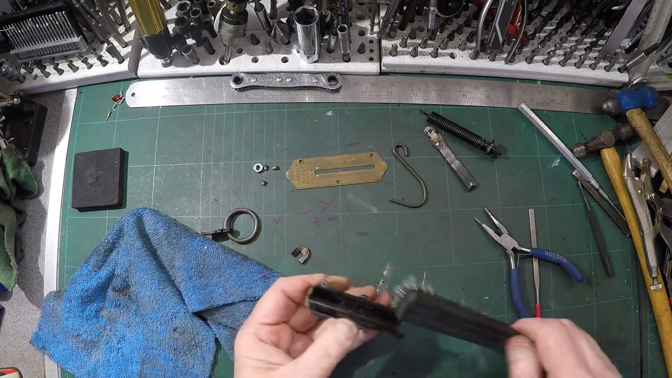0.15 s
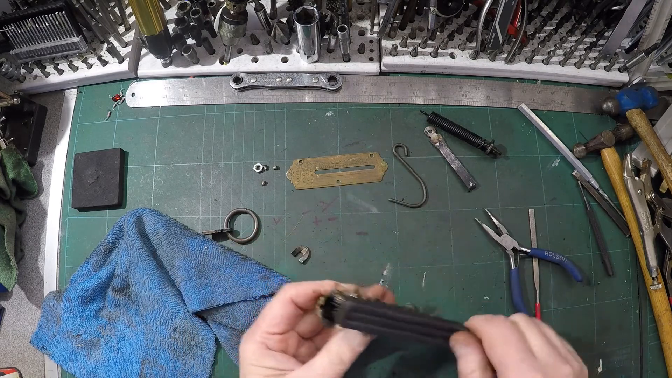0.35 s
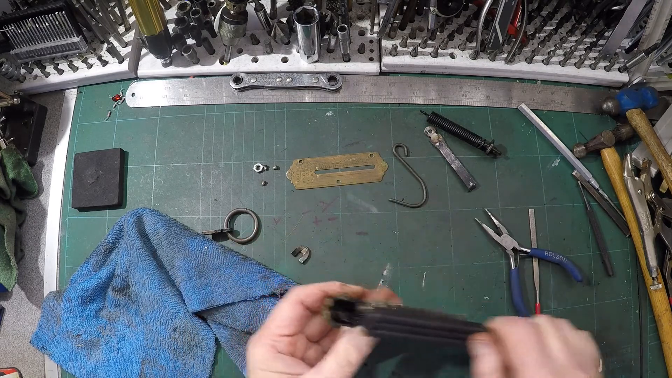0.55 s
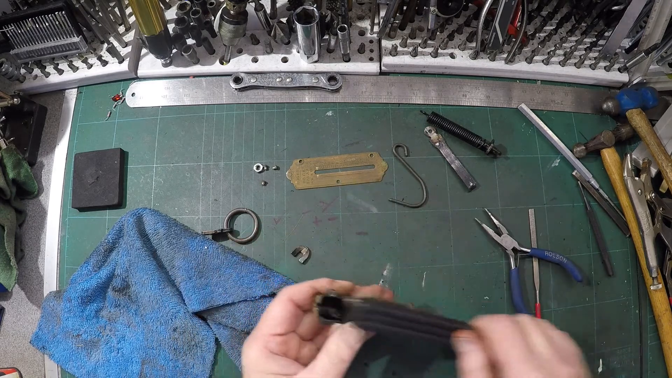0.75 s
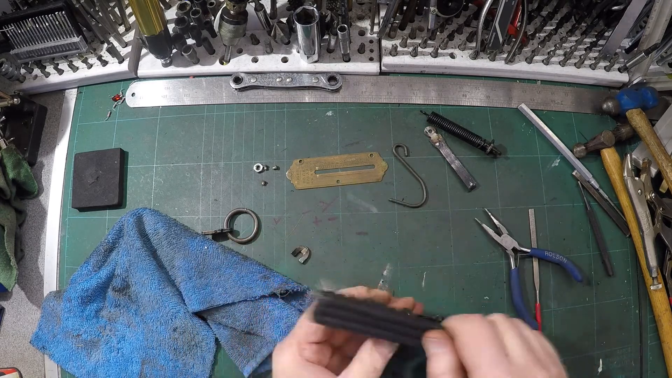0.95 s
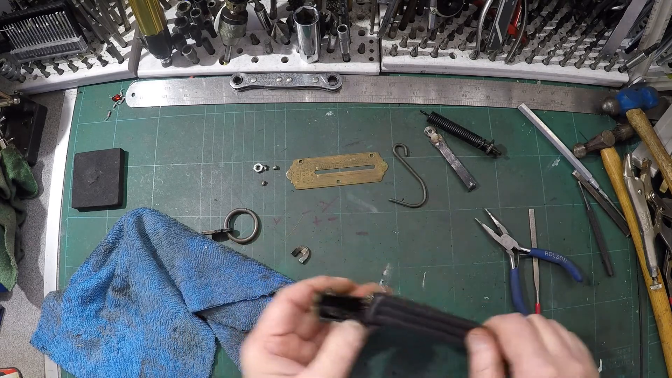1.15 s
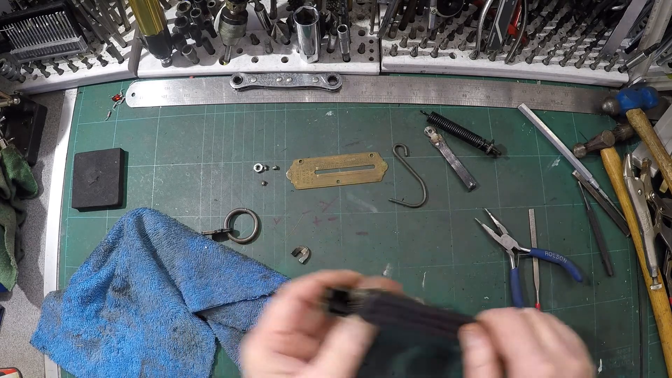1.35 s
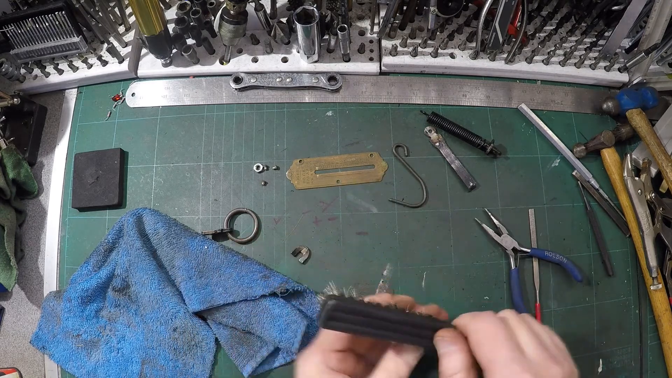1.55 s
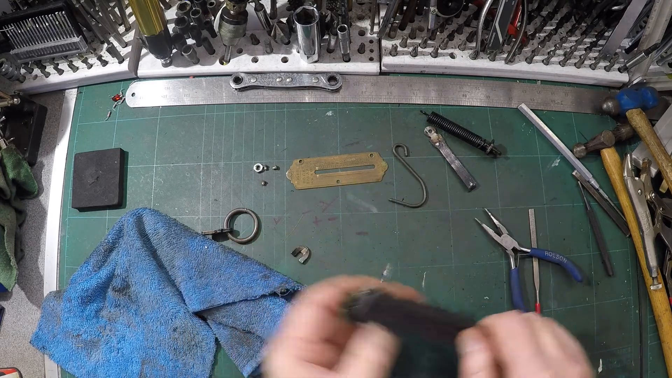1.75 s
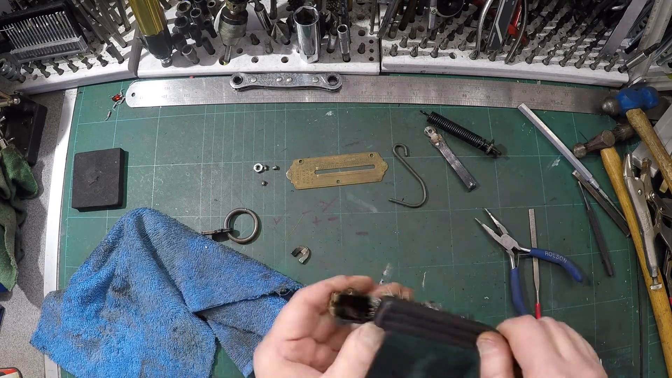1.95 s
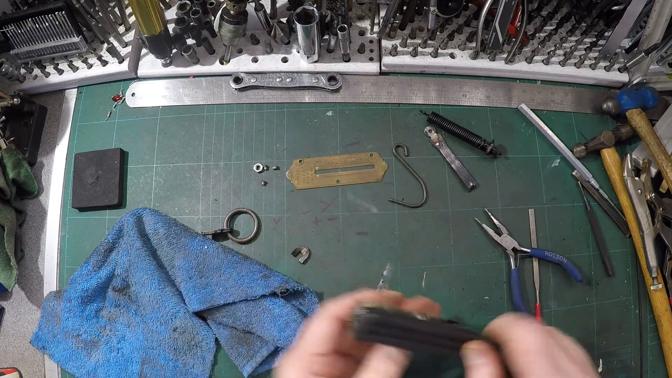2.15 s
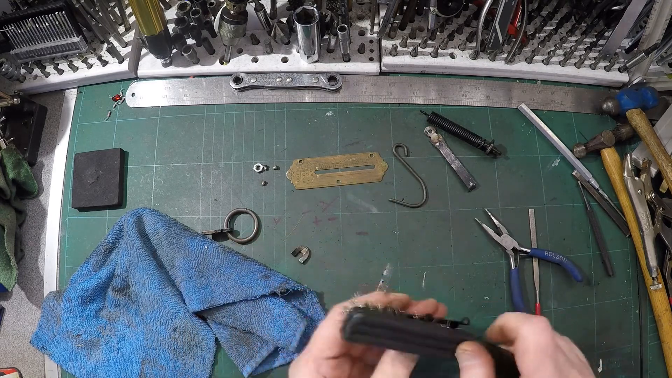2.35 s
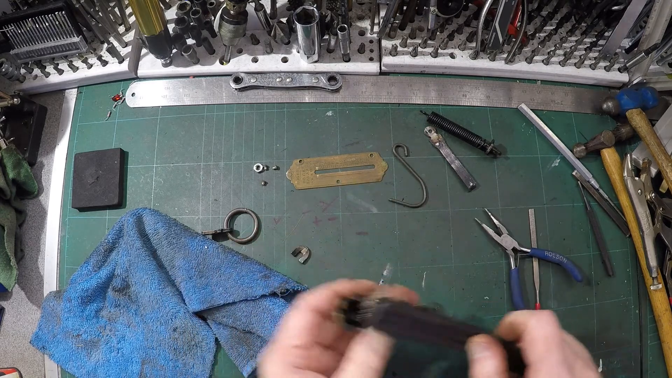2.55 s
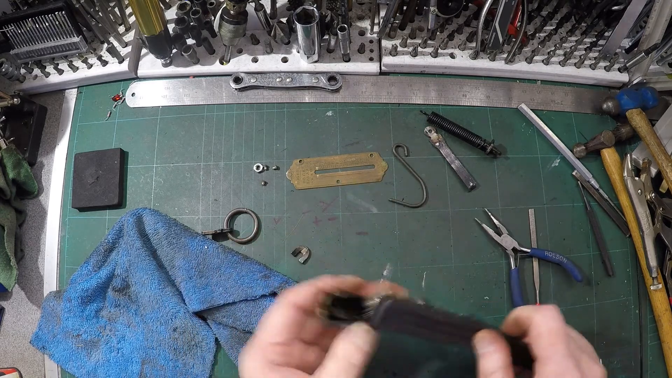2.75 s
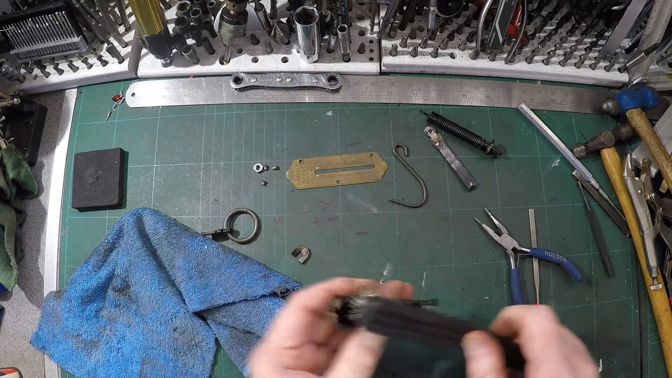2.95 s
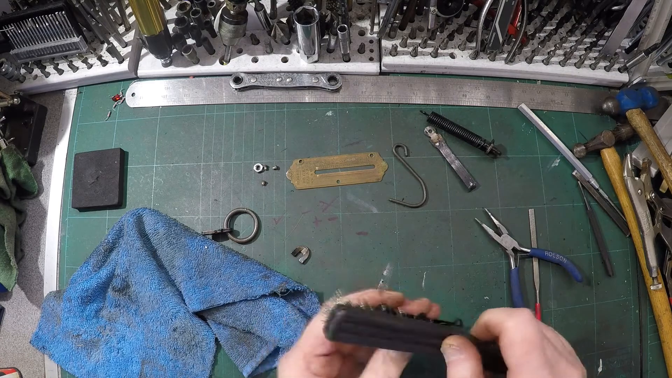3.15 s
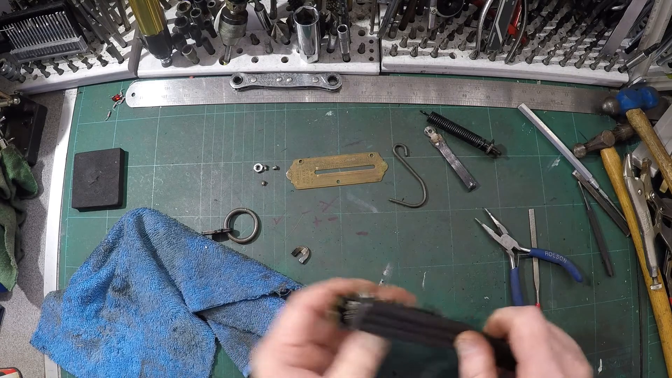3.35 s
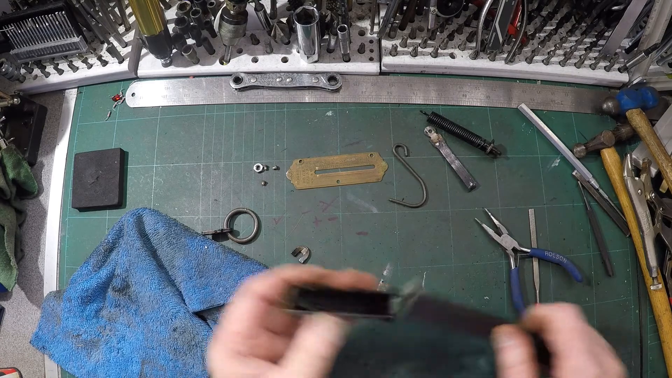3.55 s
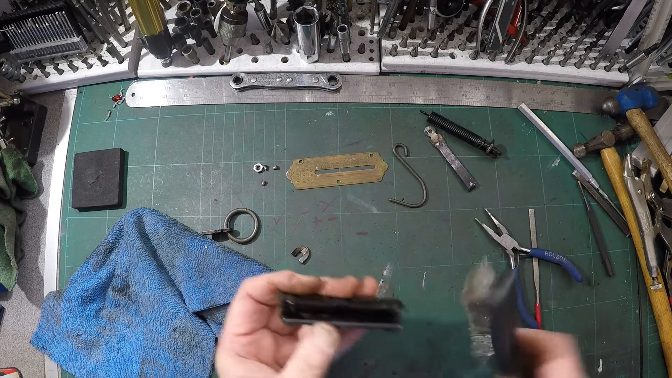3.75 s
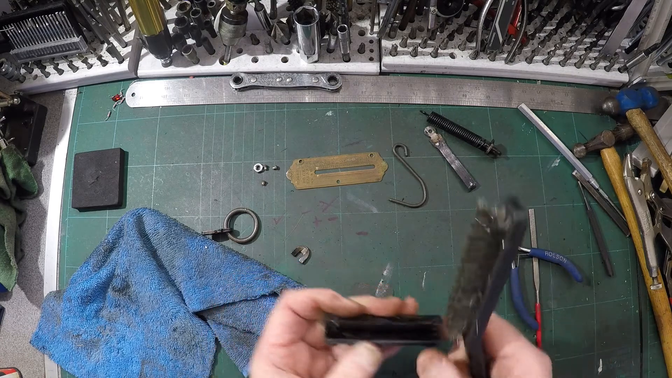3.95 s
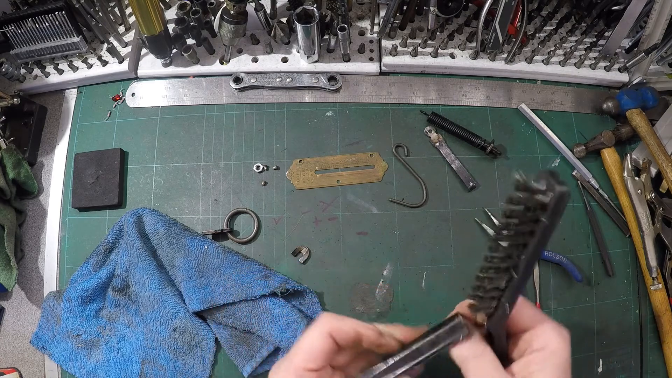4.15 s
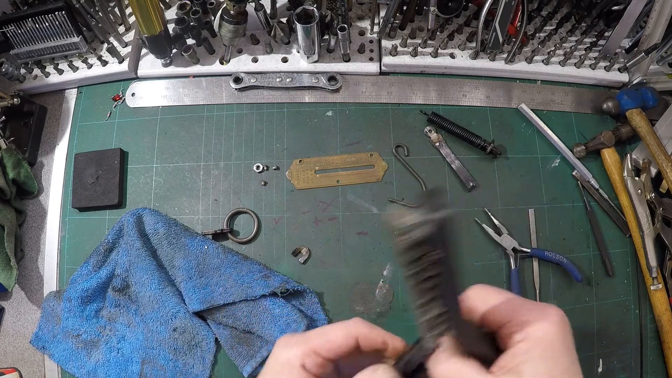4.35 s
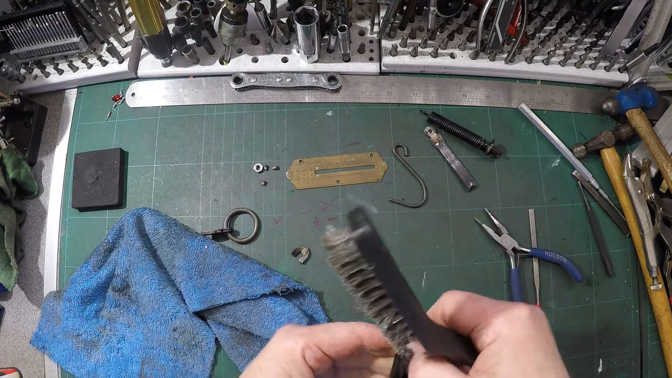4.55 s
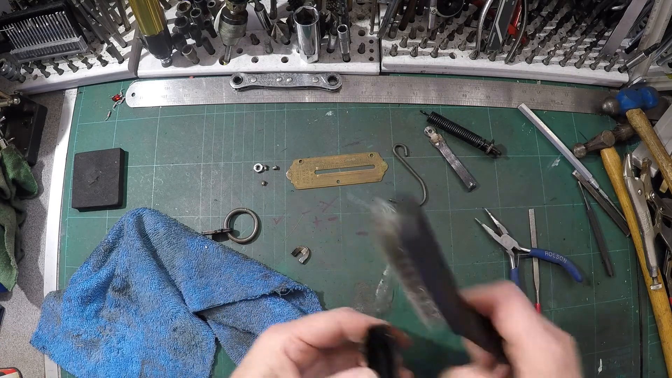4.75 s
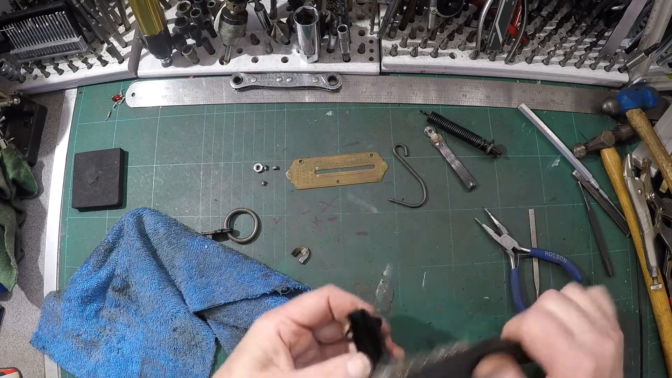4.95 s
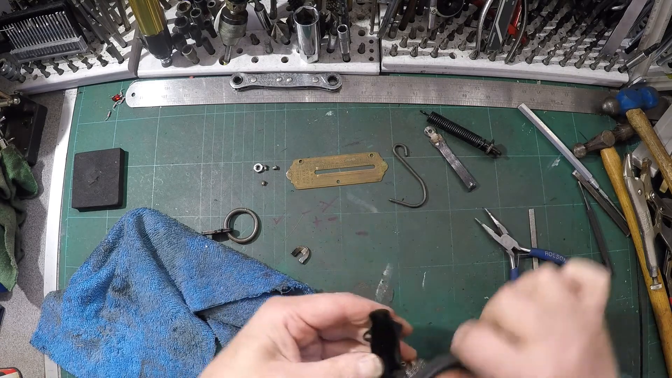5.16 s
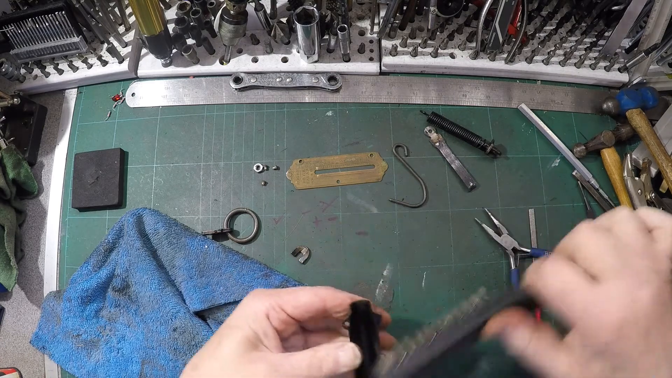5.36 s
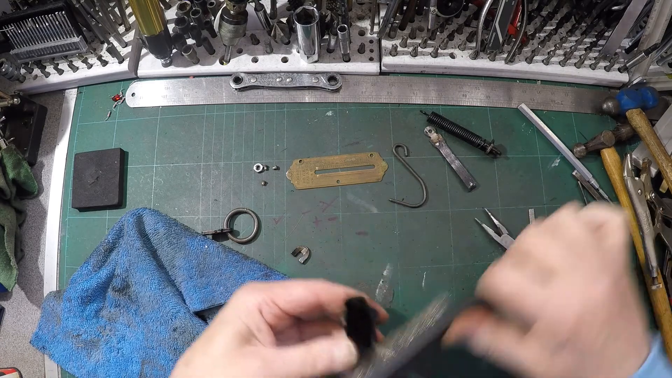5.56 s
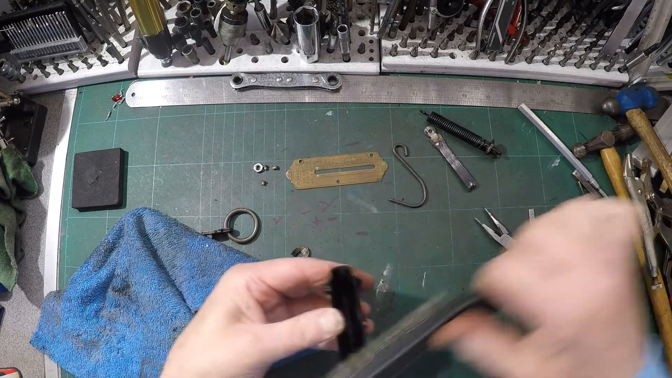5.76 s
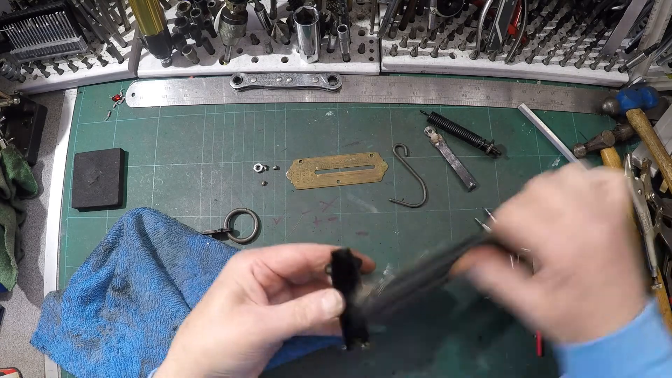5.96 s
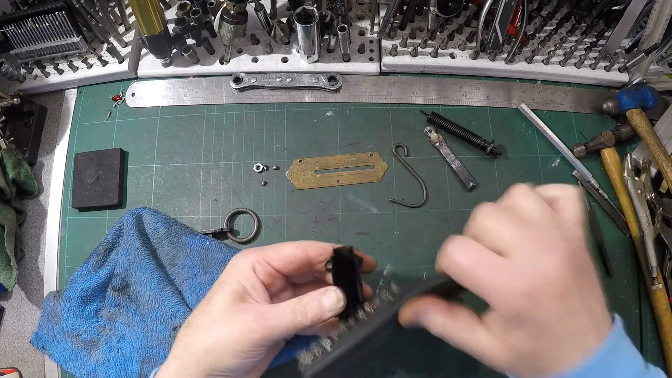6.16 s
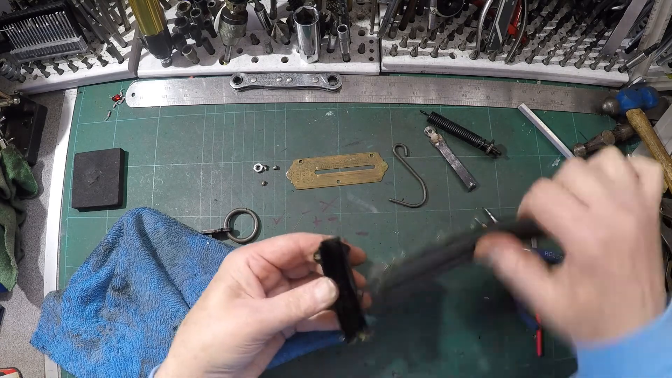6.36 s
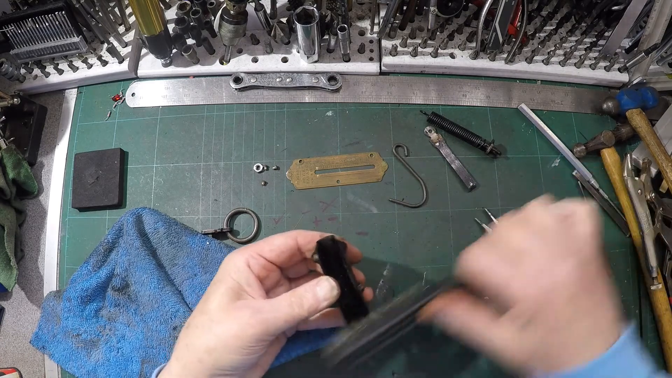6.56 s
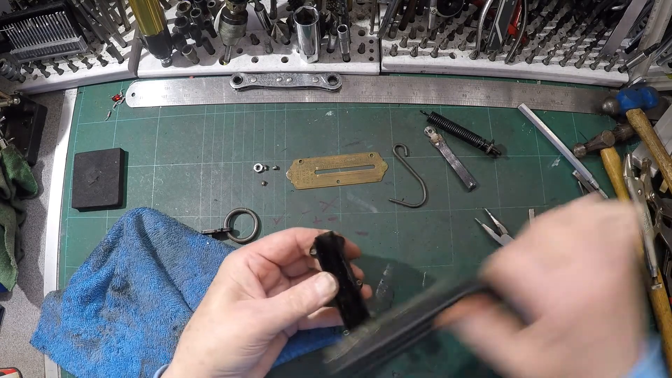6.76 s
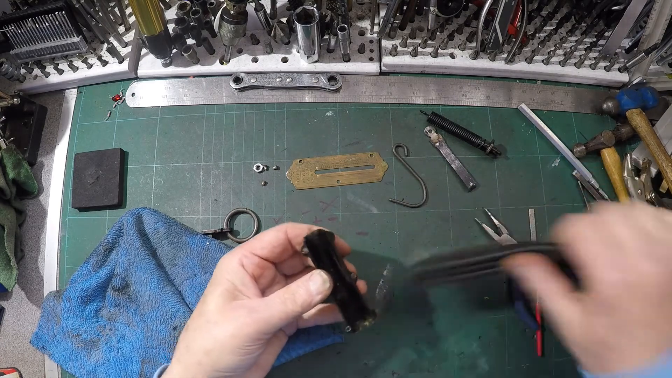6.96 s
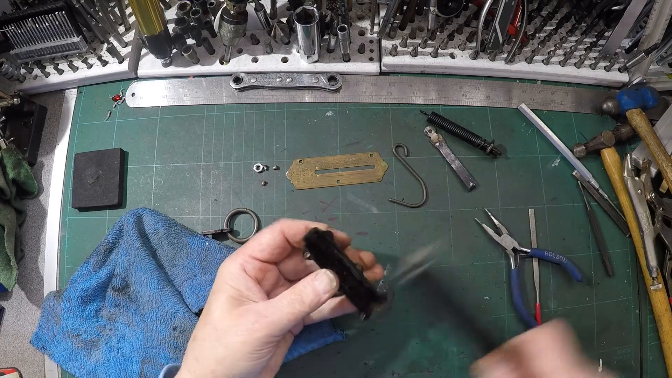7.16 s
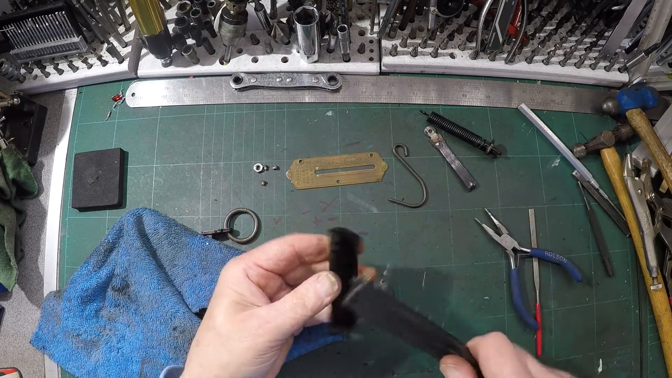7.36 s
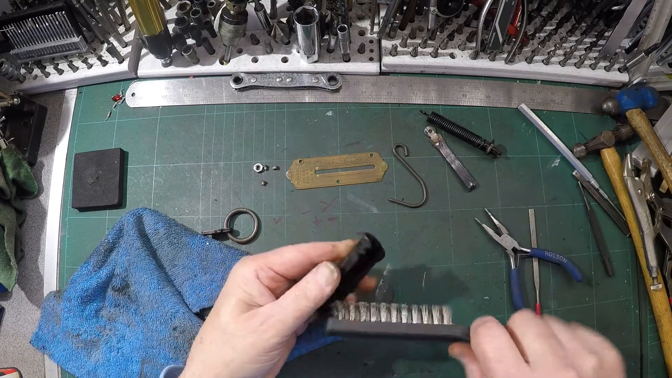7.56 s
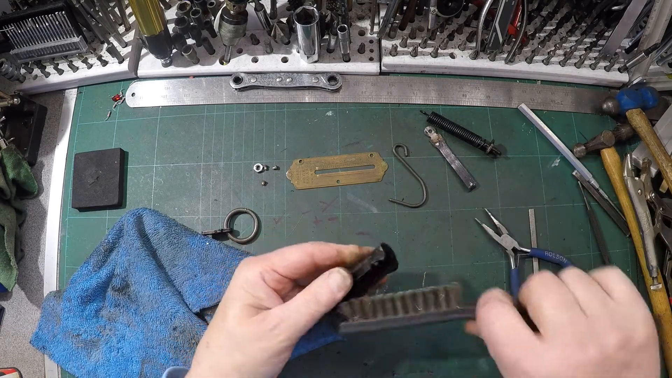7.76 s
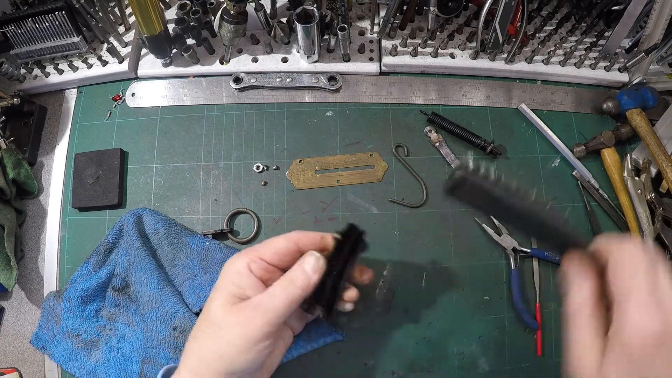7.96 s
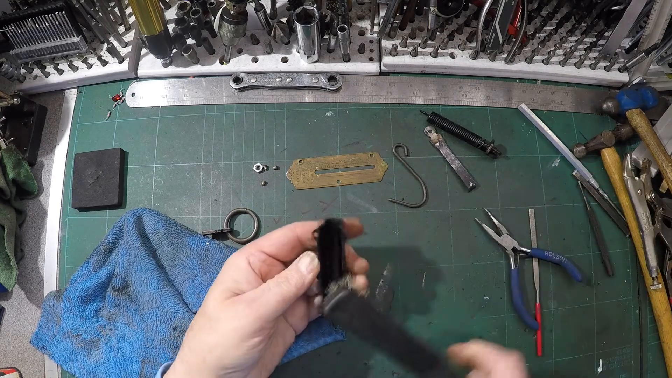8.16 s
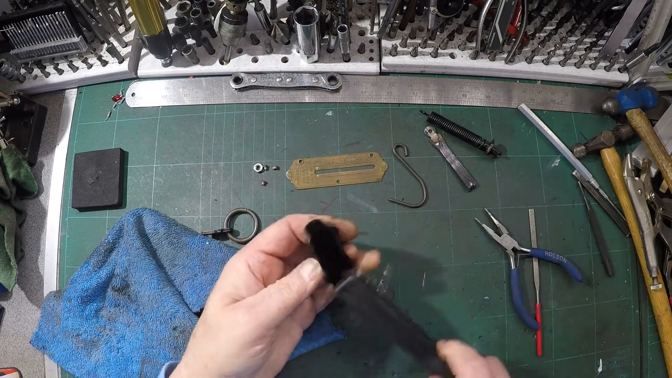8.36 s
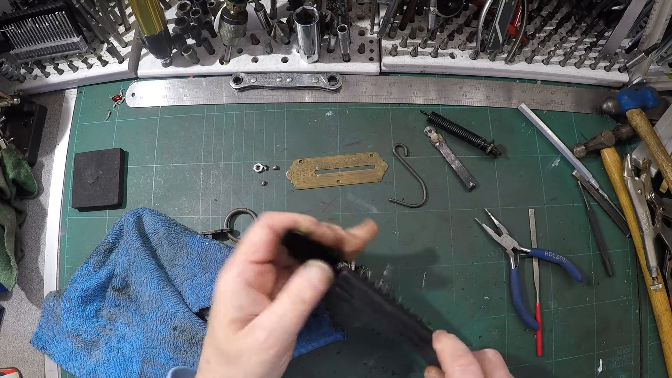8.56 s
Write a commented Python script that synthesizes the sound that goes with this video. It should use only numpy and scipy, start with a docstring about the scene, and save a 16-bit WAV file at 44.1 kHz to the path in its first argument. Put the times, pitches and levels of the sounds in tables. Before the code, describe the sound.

Close stereo sound of wire bristles rasping over a small steel piece: about seven gritty back-and-forth strokes a second, hissy and faintly ringing, for over three seconds. After a thin metallic ping the brushing almost stops, resumes as six slower spaced scratches, then softens to touches, small knocks and faint tings. A sharp ringing click comes near the end. Short workshop reflections and soft steady background noise.

```python
"""Wire brush on a small steel part

A steel wire hand brush scrubs a small hand-held steel part at a workbench, below a two-port camera microphone.
Hundreds of wires snap off the edges in each stroke: random pulses crackle, hiss and ring the modes of the part.
Quick strokes along it, a pause with light brushes, slower strokes across it, a few touches and knocks, one tap.
Coloured noise makes the steady hush of the shop; random decaying tails follow the brush and the part."""
import sys
import numpy as np
from scipy import signal
from scipy.fft import rfft, irfft, next_fast_len
from scipy.io import wavfile
from scipy.ndimage import uniform_filter1d

SR = 44100
rng = np.random.default_rng(int(sys.argv[2]) if len(sys.argv) > 2 else 0)


def persist_wave(psi):
    """Save psi, clipped to +-1, as 16-bit WAV."""
    counts = np.round(np.clip(psi, -1, 1) * 32767).astype(np.int16)
    wavfile.write(sys.argv[1], SR, np.atleast_2d(counts).T)


N = 379701
FFT = next_fast_len(N)

# Modes of the steel part. Each row: pitch in Hz, time to fall 60 dB in seconds, then its relative level in dB
# when brushed along, brushed across and tapped.
MODES = [(1450, .04, -20, -14, -23), (1600, .035, -15, -13, -19), (1800, .03, -13, -17, -20),
         (1965, .045, -16, -2, -22), (2720, .035, -14, -22, -14), (3020, .022, -11, -12, 4),
         (3220, .08, -14, -5, -14), (3440, .025, -8, -13, -13), (3700, .045, -11, -8, -11),
         (4120, .045, -9, -6, -14), (4520, .05, -13, -2, -16), (5400, .028, -15, -3, -18),
         (5960, .028, 1, -5, -20), (6090, .04, -5, -7, -20), (6200, .028, -3, -3, -20),
         (6530, .025, -8, -2, -16)]
HIGH_RING_HZ = 5000  # modes above it follow the ring effort, those below the crackle effort


def undb(db):
    """Gain of a level in dB."""
    return 10 ** (np.asarray(db) / 20)


def level(x, db):
    """Scaled to an rms level in dB."""
    return x * undb(db) / np.sqrt(np.mean(x ** 2))


def read_table(table, hz):
    """Second column of a table with Hz in the first, read on a log-frequency axis."""
    points = np.array(table)
    return np.interp(np.log(hz + 1), np.log(points[:, 0]), points[:, 1])


def coloured(x, table):
    """Gain of a (Hz, dB) table laid on the spectrum."""
    gain = undb(read_table(table, np.fft.rfftfreq(FFT, 1 / SR)))
    return irfft(rfft(x, FFT) * gain, FFT)[:N]


def response(table, size=1024):
    """Short causal response with the colour of a (Hz, dB) table, from the folded cepstrum; energy 1."""
    gain = undb(read_table(table, np.fft.rfftfreq(size, 1 / SR)))
    cepstrum = irfft(np.log(gain))
    cepstrum[1:size // 2] *= 2
    cepstrum[size // 2 + 1:] = 0
    h = irfft(np.exp(rfft(cepstrum)))
    return h / np.sqrt(np.sum(h ** 2))


def through(x, h):
    """Convolution cut to the length of the scene."""
    return signal.oaconvolve(x, h)[:N]


def fade(t60, size):
    """Decay of 60 dB in t60 seconds."""
    return np.exp(-np.log(1000) * np.arange(size) / SR / t60)


def drift(rate, spread_db):
    """Gain that wanders between random levels, rate of them a second."""
    knots = undb(spread_db * rng.standard_normal(int(N / SR * rate) + 2))
    return np.interp(np.arange(N) / SR * rate, np.arange(len(knots)), knots)


def bursts(rows, rise_s=.002):
    """Envelope of sudden contacts that die away, cut at 0.25 s: rows of start s, peak dB, t60 s."""
    out = np.zeros(N)
    for s, peak_db, t60 in rows:
        i = int(s * SR)
        out[i:i + SR // 4] += undb(peak_db) * fade(max(t60, .004), SR // 4)[:N - i]
    rise = int(rise_s * SR) + 1
    return uniform_filter1d(out, rise, origin=(rise - 1) // 2)  # looks back only


def mode(x, hz, t60):
    """One resonance, deaf far from its pitch; white noise comes out at the rms it went in with."""
    r = np.exp(-np.log(1000) / (t60 * SR))
    w = 2 * np.pi * hz / SR
    gain = np.sqrt((1 - r * r) / 2)
    return signal.lfilter(gain * np.array([1, 0, -1]), [1, -2 * r * np.cos(w), r * r], x)


def struck(s, db, hz, t60, rise_s=0.0017):
    """One mode set ringing at s seconds by a push that lasts rise_s, starting at a random phase."""
    out, t = np.zeros(N), np.arange(SR // 4) / SR
    i = int(s * SR)
    tone = np.sin(2 * np.pi * (hz * t + rng.random()))
    ring = np.minimum(t / rise_s, 1) * fade(t60, len(t)) * tone
    out[i:i + len(t)] = undb(db) * ring[:N - i]
    return out


def hush():
    """Steady hush of shop and microphone: mid and side noise; the low middle is opposite in the two channels."""
    # Colour of the mid. Each row: frequency in Hz, relative density in dB per Hz.
    mid_colour = [(20, -18), (45, -20.5), (108, -32), (135, -4), (155, 5.5), (330, -3), (520, -7.5),
                  (700, -10.5), (1040, -11.5), (1880, -16), (4220, -21), (6300, -19.5), (10200, -22.5),
                  (15300, -37.5)]
    # Colour of the side. Each row: frequency in Hz, relative density in dB per Hz.
    side_colour = [(20, -35), (108, -38), (135, -6.5), (155, 1), (300, -3.5), (840, -4.5), (1480, -12),
                   (1880, -16.5), (2670, -22), (4200, -29.5), (6300, -24), (10000, -27), (15300, -42)]
    mid_db, side_db = -54, -49.5  # rms before the top is cut
    mid = level(coloured(rng.standard_normal(N), mid_colour), mid_db)
    side = level(coloured(rng.standard_normal(N), side_colour), side_db)
    return np.array([mid + side, mid - side])


def effort():
    """How hard the wires crackle, push the part and hiss, as they load up, let go and land."""
    # Strokes and light brushes. Each row: start in seconds, length in seconds, loudest after a share of 0-1,
    # then relative levels in dB: wire crackle, hiss of the tips, ring of the part as the wires bite,
    # ring at the loudest, ring as they let go.
    strokes = [ (0.161, 0.068, .5, -55, -72, -68, -69, -72), (0.404, 0.16, .45, -43, -51.5, -40, -34, -45),
               (0.568, 0.17, .65, -41, -50, -38, -33.5, -45), (0.73, 0.16, .6, -41.5, -48, -41, -29, -38.5),
               (0.901, 0.15, .65, -36.5, -44.5, -34, -29, -27.5),
               (1.048, 0.16, .7, -40, -44.5, -32.5, -34.5, -31), (1.206, .14, .58, -37, -44, -32, -33, -38),
               (1.349, 0.14, .4, -39, -47.5, -33, -23.5, -26),
               (1.492, 0.14, .62, -33.5, -43, -26, -22, -27),
               (1.631, 0.15, .45, -37, -45.5, -25, -28, -27.5), (1.782, 0.12, .45, -34, -43, -31, -24, -21),
               (1.912, 0.14, .45, -41, -47, -26, -27, -26), (2.051, 0.13, .68, -36, -44, -26, -23.5, -26),
               (2.181, 0.15, .4, -40, -46, -28.5, -22.5, -31),
               (2.325, .131, .47, -35, -44.5, -32, -24.5, -33),
               (2.457, 0.12, .38, -36.5, -44, -32, -35, -30.5),
               (2.592, 0.13, .42, -33, -44, -25, -34, -27.5), (2.725, 0.14, .35, -38, -45, -26, -35, -28.5),
               (2.863, 0.11, .42, -35.5, -45, -29, -33, -38), (2.996, 0.12, .35, -40, -47, -37, -35, -26),
               (3.113, 0.13, .6, -35.5, -46.5, -29, -31.5, -26),
               (3.243, .13, .42, -38, -45.5, -25.5, -29, -30),
               (3.377, 0.11, .53, -35.5, -45.5, -29, -25, -40), (3.509, 0.14, .4, -37, -44, -40, -27, -30),
               (4.108, 0.076, .6, -60, -75, -54, -62, -64), (4.274, 0.077, .5, -61, -72, -55, -54, -60),
               (4.69, 0.086, .6, -66, -76, -66, -60, -64), (4.977, 0.08, .6, -62.5, -73, -66, -62, -66),
               (5.232, 0.17, .54, -42, -44.5, -36, -37, -37), (5.556, .17, .45, -40.5, -42, -41, -33, -39),
               (5.919, 0.16, .35, -38, -42.5, -40, -40, -31.5), (6.251, 0.14, .7, -35, -40, -32, -35, -30),
               (6.587, .15, .3, -40.5, -45.5, -31, -29, -33), (6.893, 0.12, .55, -40, -46, -36, -30, -28.5),
               (7.025, .17, .5, -63.5, -68, -58, -60, -56), (7.487, .08, .4, -65, -72, -58, -59, -61),
               (7.677, .11, .3, -62.5, -70, -58, -60, -59),
               (7.863, 0.093, .35, -47.5, -49.5, -42, -41, -44), ]
    # Tufts landing on the part. Each row: time in seconds, relative peak in dB, ring above the crackle
    # in dB before the mix gains.
    touches = [(0.382, -20, -11.5), (0.5876, -39, -1), (0.751, -29, -5), (1.4995, -28, 4),
               (1.7893, -23, -7), (1.915, -28, 0), (1.939, -29, -6), (1.9939, -32, -3), (2.337, -21, -5),
               (2.3736, -21, -1), (2.606, -27, -4), (2.9871, -19, -9), (3.1326, -26, 3), (3.2505, -26, -3),
               (3.478, -27, -8), (3.6104, -18, -17), (4.916, -34.5, -12), (5.1795, -24, -5),
               (5.202, -28, -5), (5.521, -23.5, -12), (5.891, -21, -11), (5.897, -22, -22),
               (5.9205, -26, -20), (6.231, -19, -10.5), (6.569, -21.5, -9), (6.8772, -18.5, -13),
               (6.896, -29, -5), (7.294, -32.5, 0.5), (7.4215, -43, -7), (7.4819, -36.5, -11),
               (8.364, -24.5, -7.5), (8.4103, -31, -11), (8.437, -28, -6), (8.573, -32.5, -7.5)]
    # Shapes of one stroke, in dB added at start, bite, loudest, letting go and end.
    crackle_shape_db = np.array((-18, -4.5, -0.5, -6, -25.5))
    hiss_shape_db = np.array((-20, -4.5, 0.5, -3, -17))
    bite_s, let_go_s = 0.025, 0.033  # the wires load up at the start and lift off at the end
    ring_start_db, ring_end_db = -16.5, -36  # under the bite, under the letting go
    touch_t60_s = 0.035

    t = np.arange(N) / SR
    hand = np.zeros((3, N))
    for s, length, share, crackle_db, hiss_db, bite_db, top_db, go_db in strokes:
        letting_go = max(length - let_go_s, bite_s)
        loudest = np.clip(share * length, bite_s, letting_go)
        knots = s + np.array([0, bite_s, loudest, max(length - let_go_s, loudest), length])
        ring_db = [bite_db + ring_start_db, bite_db, top_db, go_db, go_db + ring_end_db]
        shapes = (crackle_db + crackle_shape_db, ring_db, hiss_db + hiss_shape_db)
        on = (t >= s) & (t < s + length)
        hand[:, on] += [undb(np.interp(t[on], knots, db)) for db in shapes]
    crackle, ring, hiss = hand * drift(150, 1.5)  # whole tufts catch unevenly

    landing = bursts([(s, db, touch_t60_s) for s, db, _ in touches], rise_s=0.0033)
    landing_ring = bursts([(s, db + rel, touch_t60_s) for s, db, rel in touches], rise_s=0.0027)
    crackle = undb(5.0) * crackle + undb(-14.5) * landing
    ring = ring + undb(0.5) * landing_ring
    hiss = hiss + undb(-27.5) * landing
    return crackle, ring, hiss


def snaps():
    """Wires let go at random moments, either way and some harder: sparse pulses with an overall rms of 1."""
    snaps_per_s, spread_db = 7000, 2.5
    when, force, sign = rng.random((3, N))
    hard = np.minimum(-np.log(1 - force), 4)
    size = undb(spread_db * hard) * np.sign(sign - .5)
    return level((when < snaps_per_s / SR) * size, 0)


def part(low_push, high_push, modes):
    """Each snap lands somewhere else, so every mode takes its own share; in the grip mode levels drift."""
    turn_s = 3.9  # the part is turned in the hand: brushed along before, across after
    along = np.arange(N) / SR < turn_s
    out = 0
    for hz, t60, along_db, across_db, _ in modes:
        gain = np.where(along, undb(along_db), undb(across_db)) * drift(9, 3.5)
        share = 2 * rng.random(N) - 1
        push = high_push if hz > HIGH_RING_HZ else low_push
        out = out + mode(push * gain * share, hz, t60)
    return out


def brush(crackle, ring, hiss, modes):
    """Snaps crackle and set the part ringing; separate snaps make the thin hiss of the sliding tips."""
    # Colour of a wire snapping off an edge. Each row: frequency in Hz, relative level in dB.
    wire_colour = [(700, -27.5), (1200, -24), (1800, -12.5), (2400, -15), (3300, -4), (4800, -6.5),
                   (6500, -0.5), (7700, -9), (9000, -36.5), (15000, -36)]
    # Thin hiss of the sliding tips. Each row: frequency in Hz, relative level in dB.
    tip_colour = [(5000, -18.5), (7800, 4.5), (8800, -4.5), (9700, 1), (10500, -5), (11100, -15.5),
                  (12100, -4), (14200, -10), (15200, -12)]
    pulses = snaps()
    wires = undb(-2.0) * through(pulses * crackle, response(wire_colour))
    tips = undb(1.5) * through(snaps() * hiss, response(tip_colour))
    body = part(undb(-7.0) * pulses * crackle, undb(-3.5) * pulses * ring, modes)
    return wires + tips + body


def clear_rings():
    """Rings of the part, each a decaying sine; overlapping near 7.7 s as a light brush rubs on."""
    # Each row: time in seconds, nominal peak in dB before the port filters, pitch in Hz.
    ring_rows = [(3.478, -33, 6040), (3.5955, -20, 5960), (3.6017, -16, 5930), (3.6099, -19, 6050),
                 (3.6245, -18.5, 6030), (4.1344, -46, 5390), (4.1594, -49, 5900), (7.66, -57, 5420),
                 (7.685, -55, 5430), (7.7094, -51, 5440), (7.73, -51, 5430), (7.749, -55, 5420),
                 (7.8116, -56, 5410), (7.84, -55, 5420), (7.9047, -40, 5320), (7.9194, -34, 6520),
                 (7.922, -42, 5450), (8.4366, -37, 6080), (8.459, -19.5, 6085)]
    return sum(struck(s, db, hz, t60=0.073) for s, db, hz in ring_rows)


def knocks():
    """The brush back bumps the part and the hand: bursts of noise, each in its own band."""
    # Each row: time in seconds, relative peak in dB, time to fall 60 dB in seconds, lower edge in Hz,
    # upper edge in Hz.
    knock_rows = [(6.61, -39.5, 0.18, 420, 2500), (6.621, -45, 0.081, 150, 280),
                  (6.939, -44, 0.16, 140, 260), (7.281, -41, 0.24, 450, 3000),
                  (7.282, -47, 0.3, 3900, 4600)]
    noise = rng.standard_normal(N)
    out = 0
    for s, db, t60, low_hz, top_hz in knock_rows:
        band = [(low_hz / 2, -20), (low_hz, 0), (top_hz, -9), (2 * top_hz, -26), (4 * top_hz, -50)]
        burst = noise * bursts([(s, db, t60)], rise_s=0.0036)
        out = out + through(burst, response(band, size=2048))
    return out


def tap():
    """One hard blow on the part: a short rattling crack of noise and all its modes struck together."""
    # Each row: time in seconds, relative peak in dB.
    blows = [(8.463, -7)]
    blow = rng.standard_normal(N) * bursts([(s, db, .02) for s, db in blows], rise_s=0.00067)
    crack = response([(500, -40), (1000, -13), (3000, -6), (5000, -2), (7500, -18), (15000, -39)])
    ring = sum(struck(s, db + tapped_db, hz, t60)
               for hz, t60, _, _, tapped_db in MODES for s, db in blows)
    return undb(-16.0) * through(blow, crack) + undb(-7.0) * ring


def shop(x, count=3, move_s=.07):
    """Tail of the shop, mid and side; the hands move, so the sound passes through random tails in turn."""
    t60_s, tail_db = 0.22, -9
    place = (np.arange(N) / SR / move_s).astype(int) % count
    tails = rng.standard_normal((count, 2, SR // 3)) * fade(t60_s, SR // 3)
    tails *= undb(tail_db) / np.sqrt(np.sum(tails[0, 0] ** 2))
    out = 0
    for k in range(count):
        share = np.sqrt(np.abs(uniform_filter1d(1. * (place == k), SR // 50)))  # crossfaded
        out = out + np.array([through(x * share, h) for h in tails[k]])
    return out


def ports(x, other):
    """Two ports share the mid; what differs between them is `other` and the side of the tail. Lows are cut."""
    # Colour of the difference. Each row: frequency in Hz, gain of the side in dB.
    side_colour = [(600, -5), (1500, 4), (3000, -15.5), (4500, -17), (6000, -12), (7500, -3.5), (10000, 2),
                   (15000, -4.5)]
    # Lean of the pair. Each row: frequency in Hz, left minus right in dB.
    lean_db = [(4500, 0), (6000, 1.5), (7200, 3), (8500, 0)]
    # Lead of the left port. Each row: frequency in Hz, phase in radians.
    lead_rad = [(4500, 0.1), (6500, 1), (8000, 0.7)]
    tail_mid, tail_side = shop(x)
    mid = x + tail_mid
    side = coloured(other + tail_side, side_colour)
    hz = np.fft.rfftfreq(FFT, 1 / SR)
    # half of the lean and lead goes to each port
    lean = undb(read_table(lean_db, hz) / 2) * np.exp(.5j * read_table(lead_rad, hz))
    left = irfft(rfft(mid + side, FFT) * lean, FFT)
    right = irfft(rfft(mid - side, FFT) / lean, FFT)
    low_cut = signal.butter(8, 110, "high", fs=SR, output="sos")
    return signal.sosfilt(low_cut, np.array([left, right])[:, :N])


def scene():
    """Everything at the bench; each port favours other wires and hears only the high rings differently."""
    hand = effort()
    high_modes = [m for m in MODES if m[0] > HIGH_RING_HZ]
    bench = brush(*hand, MODES) + clear_rings() + knocks() + tap()
    other = brush(*hand, high_modes)
    return ports(bench, other) + hush()


def record(dry):
    """The camera cuts the top: a steep elliptic low-pass at 15.3 kHz."""
    return signal.sosfilt(signal.ellip(10, .2, 80, 15300, fs=SR, output="sos"), dry)


dry = scene()
out = record(dry)
persist_wave(out)
```